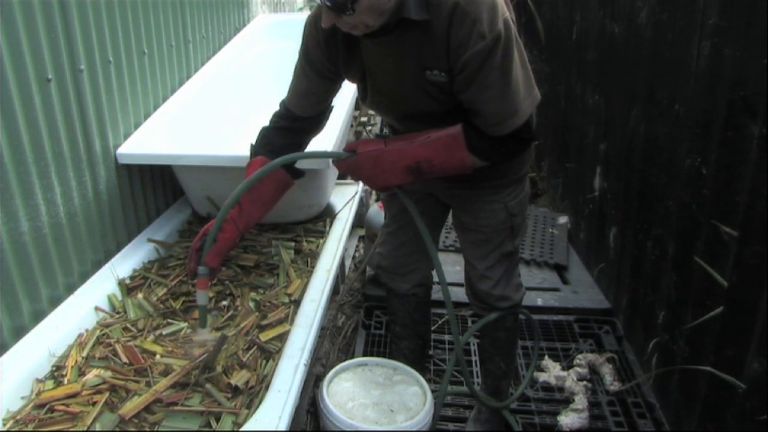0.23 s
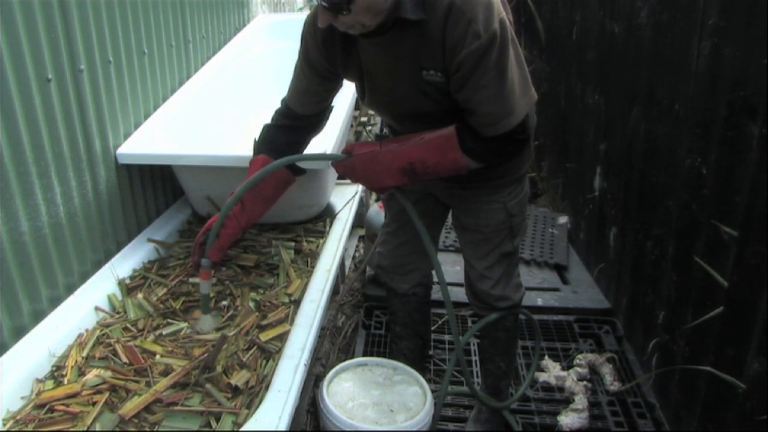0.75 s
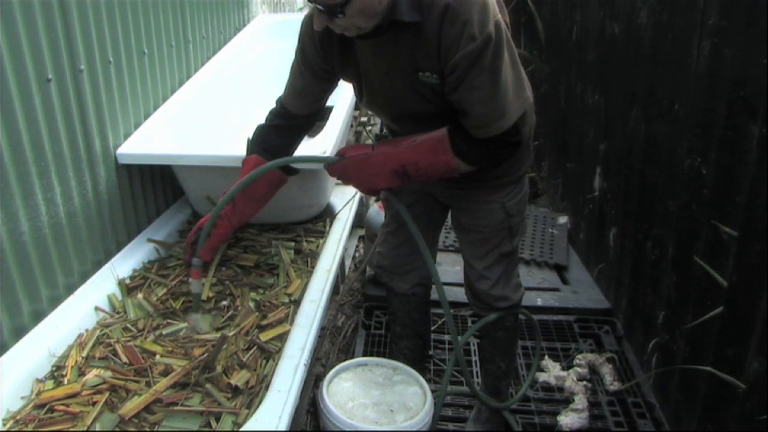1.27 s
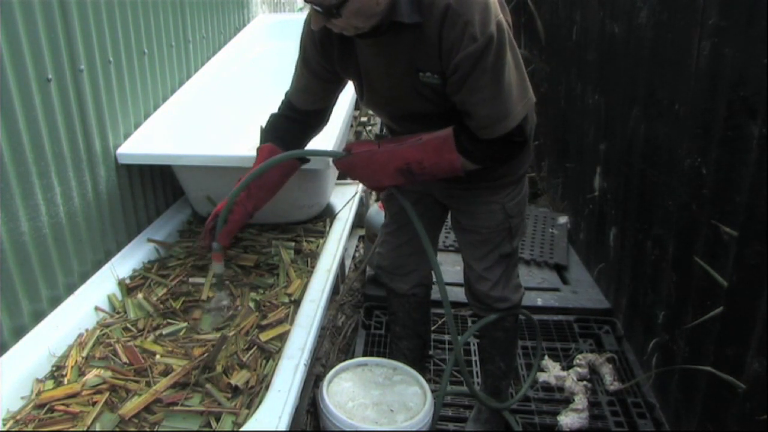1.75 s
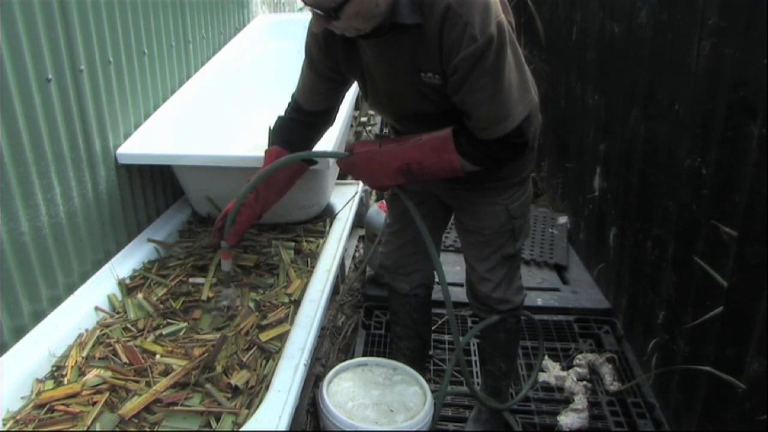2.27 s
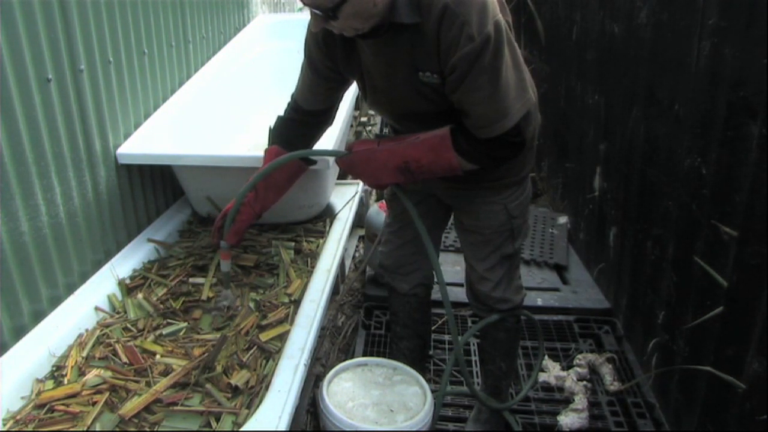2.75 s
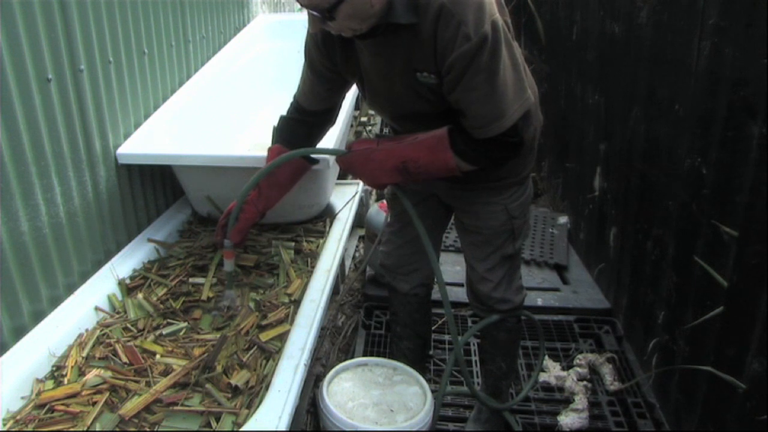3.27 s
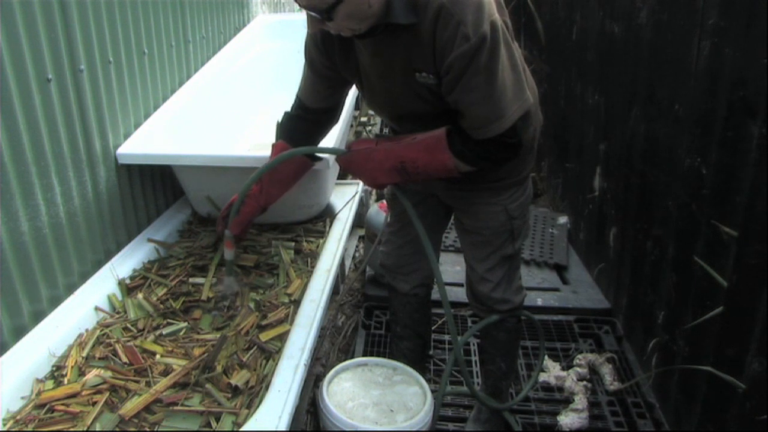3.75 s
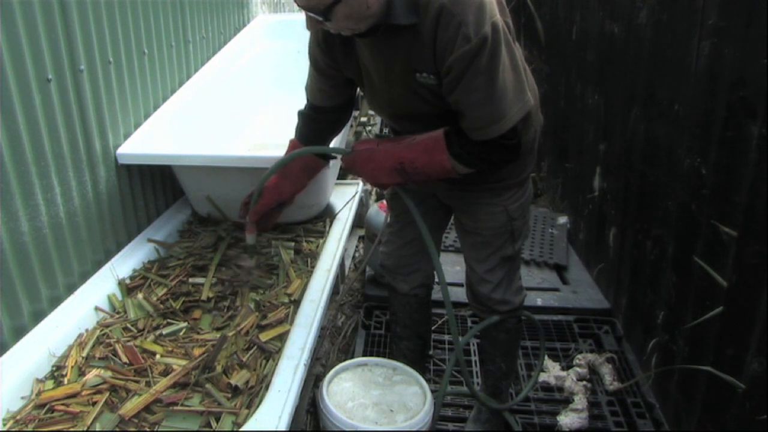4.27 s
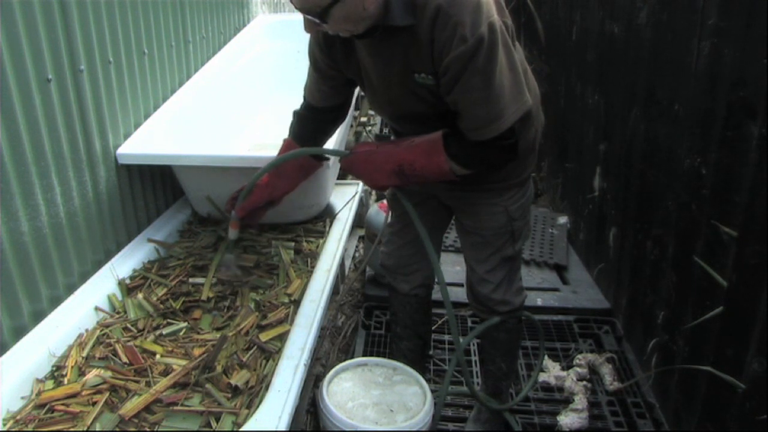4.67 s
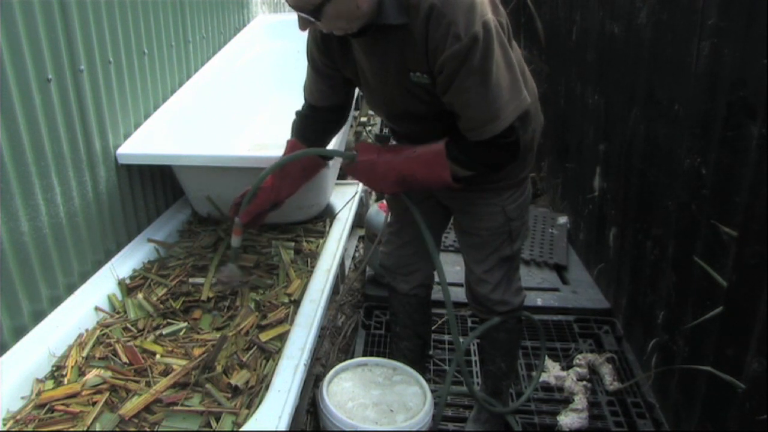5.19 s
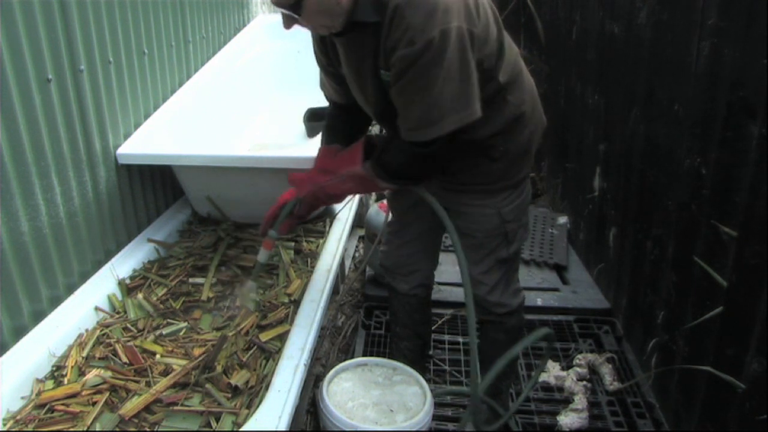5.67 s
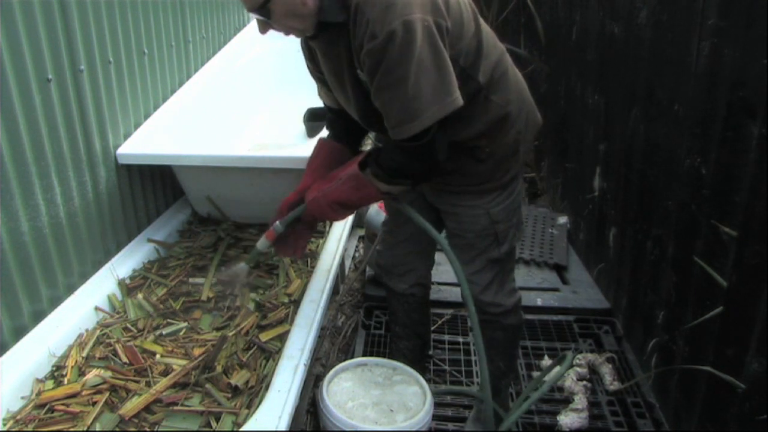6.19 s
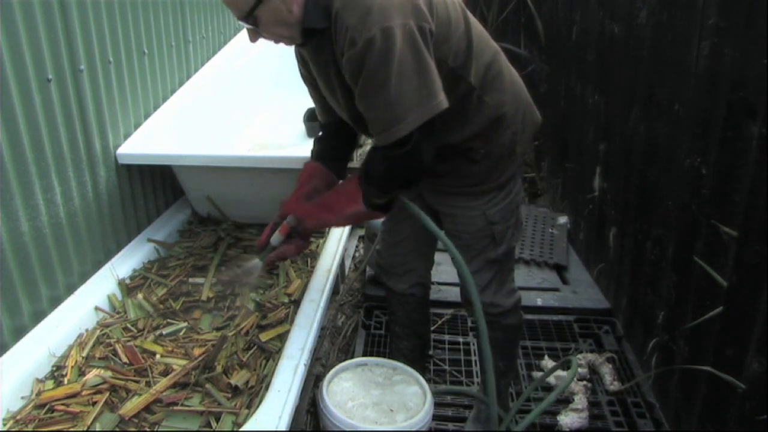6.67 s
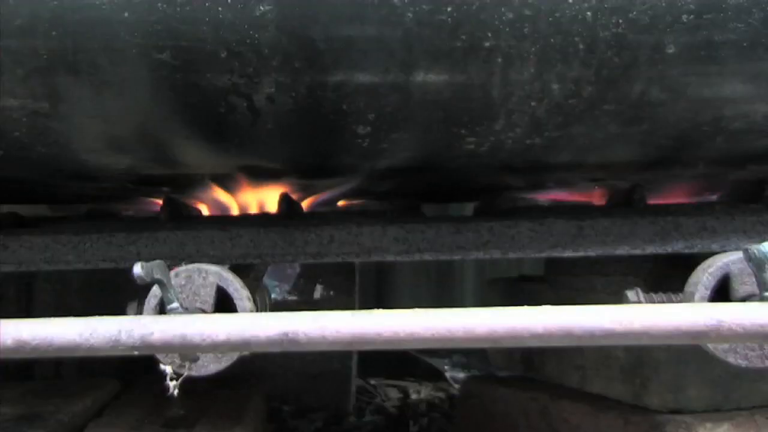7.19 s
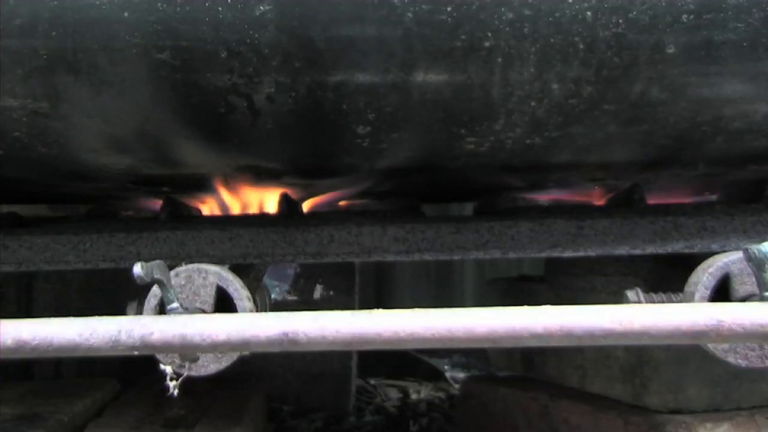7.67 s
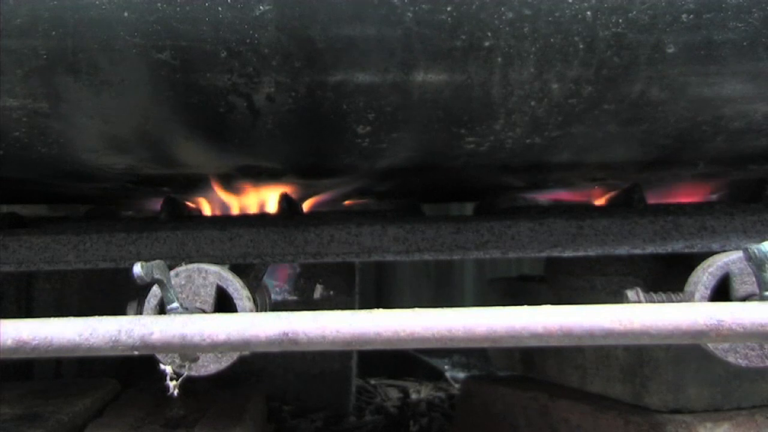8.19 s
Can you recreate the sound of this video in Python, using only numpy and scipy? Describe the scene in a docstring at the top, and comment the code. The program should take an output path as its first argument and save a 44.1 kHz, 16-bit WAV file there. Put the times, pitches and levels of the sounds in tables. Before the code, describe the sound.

Close by in a work area, water from a hose hisses steadily and patters on wet leaves and stalks in a metal tub, with little gurgles and a low motor hum behind. The jet gradually turns into a deeper, hollow drumming that makes the tub resonate. Then the sound switches abruptly to a soft, steady gas burner, with a single short, high squeak just after the change.

```python
"""A hose jet sprays chopped stalks soaking in a metal bath; a motor hums nearby.
Tiny bubbles hiss, mist rushes, drops splatter and patter; brief gurgles and whistles come and go.
The jet drums ever deeper into the water as it is lifted, ringing the bath and its shell.
At 7 s the scene changes at once to a quiet gas burner under a tank, with one small squeak."""
import sys
import numpy as np
from scipy import signal
from scipy.fft import rfft, irfft, next_fast_len
from scipy.io import wavfile
from scipy.ndimage import uniform_filter1d, map_coordinates

SR = 44100
rng = np.random.default_rng(int(sys.argv[2]) if len(sys.argv) > 2 else 0)


def generate_wav(signal):
    """Clip the signal to [-1, 1] and save it as 16-bit WAV at the path in sys.argv[1]."""
    frames = np.transpose(np.atleast_2d(signal))
    scaled = np.clip(frames, -1, 1) * 32767
    pcm = np.round(scaled).astype(np.int16)
    wavfile.write(sys.argv[1], SR, pcm)


N = 372192
T = np.arange(N) / SR
CHANGE_S = 7.03

# nozzle path: t/s, hiss edge/Hz, closeness to the stalks/0-1
NOZZLE_PATH = [(0, 8300, 0.6), (.7, 8950, 1), (1.7, 8800, 0.6), (2.4, 8800, 0.5), (3.1, 8600, 0.6),
               (3.6, 8100, 0.3), (4.1, 8000, 0.3), (4.8, 8400, 0.4), (5.4, 8150, 0.4), (6.5, 8060, 0.2),
               (7, 8900, 0)]
# jet sags and swells as the nozzle moves: t/s, half length/s, hiss/dB, mist/dB
JET_SWERVES = [(0, .2, -0.5, 0.5), (0.46, 0.11, 0.7, 0.5), (1.553, 0.036, -3, 2), (1.915, 0.049, 1, -1),
               (2.201, .12, 1, 0), (3.17, 0.1, -3.5, 3), (3.25, 0.37, 0.5, -2.7), (4.28, .1, 0.5, 1.2),
               (4.683, 0.18, 1.5, -1), (5.197, 0.026, -3, 1), (5.4, 0.24, 0, 2), (5.626, 0.026, 3.5, -1),
               (5.822, 0.03, -4.5, 1), (5.92, 0.046, 2, 0), (6.3, 0.32, 1.9, 1), (6.6, 0.055, 0.5, -1.5),
               (6.73, .06, 0.5, -2.5), (6.86, .06, 1, 2.5)]
# echoes off the bath's sides: delay/ms, gain
WALL_ECHOES = [(1.45, 0.27), (2.049, 0.16), (3.3, 0.16), (4.8, 0.33)]
# gap under a close nozzle: f/Hz, width/Hz, level/dB
GAP_MODES = [(4660, 170, -4), (5270, 150, -4), (5730, 150, -6), (6190, 150, -7), (6750, 200, -10),
             (7280, 200, -8)]
# spray spectra: f/Hz, relative level/dB
HISS_SPECTRUM = [(1500, -37), (3000, -28), (4000, -18), (4900, -8.5), (5700, -2.5), (6400, -1),
                 (7200, -1.1), (8200, -1.5), (9300, -3.5), (11000, -21), (15800, -28)]
MIST_SPECTRUM = [(4000, -22), (7000, -7.5), (8700, 0), (10000, 1.5), (11500, -3), (13300, -11.5),
                 (15800, -22)]
SIZZLE_SPECTRUM = [(6000, -30), (9500, -8), (12000, 0.5), (13500, 0.5), (15800, -2)]
LEAF_SPECTRUM = [(1200, -18), (2200, -6), (3000, -3), (3900, 2), (4700, 1.5), (5400, 1), (6500, -32),
                 (10000, -48)]
STALK_SPECTRUM = [(300, -4), (650, -8.5), (1050, -5.5), (1400, 0.5), (1850, 0.5), (2400, -2.5),
                  (3000, -2.5), (4500, -36), (9000, -35)]
# drops on leaves, drops on stalks, drumming on water: t/s, base level/dB
LEAF_LEVEL = [(0.0, -39), (0.51, -34.5), (3.13, -39.5), (3.28, -42), (3.97, -38), (4.05, -41), (5.08, -37),
              (7.0, -38), (7.02, -39)]
STALK_LEVEL = [(0, -45.5), (.35, -49.5), (.55, -44.5), (1.05, -43.5), (1.25, -46.5), (1.7, -44), (2.4, -44),
               (3.6, -45), (4.0, -44), (4.8, -46), (5.4, -42), (7, -43.5)]
DRUM_LEVEL = [(0.0, -60), (0.5, -58.5), (2.48, -57), (4.0, -50.5), (4.98, -46.5), (5.25, -42.5), (5.6, -39),
              (5.9, -37.5), (6.3, -39), (6.94, -41), (7.02, -42.5)]
# brief gliding resonances: t/s, length/s, first f/Hz, last f/Hz, width/Hz, final level/dB
BRIEF_RESONANCES = [(0, 0.34, 1320, 1317, 250, -51), (0, 0.66, 4530, 4580, 350, -45),
                    (0, 0.73, 661, 683, 295, -50.5), (0.499, 0.27, 2170, 2000, 450, -46),
                    (.45, 1.34, 3070, 2960, 900, -47.5), (0.6, 0.88, 5250, 5330, 280, -41),
                    (0.8, 0.31, 704, 666, 280, -45), (0.929, 0.12, 6900, 6850, 220, -33),
                    (1.12, 0.41, 6680, 6760, 220, -38), (1.244, 0.55, 682, 682, 295, -49),
                    (1.277, 0.19, 2030, 2100, 400, -44), (1.63, 0.11, 631, 668, 260, -40.5),
                    (1.665, 0.098, 1716, 1660, 260, -41.5), (1.754, 0.115, 2055, 2130, 300, -43.5),
                    (1.81, 0.15, 7300, 8100, 600, -34), (1.865, 0.071, 2140, 2150, 270, -38.5),
                    (1.95, 0.26, 2148, 2110, 260, -36.5), (2.119, 0.09, 2120, 2080, 280, -39),
                    (1.85, 0.4, 2750, 2780, 400, -45.5), (1.9, 0.3, 3950, 4020, 300, -43),
                    (2.05, 0.22, 1598, 1500, 704, -43), (2.1, 0.27, 5950, 5780, 420, -37),
                    (2.251, 0.37, 2130, 2130, 240, -44.5), (2.401, 0.75, 4730, 4690, 220, -43.5),
                    (2.548, 0.071, 2110, 1384, 420, -42), (2.65, 0.98, 1962, 1994, 650, -45.5),
                    (3.419, 0.32, 2180, 2266, 280, -48), (2.302, 1.96, 716, 720.5, 250, -54.5),
                    (2.9, 1.0, 2804, 2804, 500, -52), (3.28, 0.33, 7900, 8000, 350, -38),
                    (3.471, 0.22, 6120, 6170, 240, -37), (3.631, .08, 1400, 1400, 150, -49),
                    (4.0, 1.2, 135.1, 135, 110, -49.5), (4.381, 0.19, 733, 772, 280, -42),
                    (4.52, 0.083, 6670, 6620, 260, -39), (4.547, 0.36, 6120, 6450, 280, -34.5),
                    (4.45, 0.92, 201, 215.4, 80, -49.5), (5.17, 0.1, 481, 467, 50, -44),
                    (5.788, 0.088, 309, 311, 30, -41), (5.73, 0.23, 146, 154.6, 60, -42),
                    (5.85, 0.53, 502.5, 496, 60, -43), (6.05, 0.44, 160.5, 150, 50, -43.5),
                    (6.5, 0.43, 149, 149.8, 50, -48), (6.869, 0.13, 549, 660, 150, -42)]
# churned water: f/Hz, relative level/dB
DRUM_SPECTRUM = [(25, -27), (52, -20), (88, -6), (140, 1), (230, 0), (330, -4), (480, -2), (720, -2),
                 (1150, -5.5), (1700, -17), (3000, -16.5), (6000, -49)]
# bath and shell resonances: f/Hz, width/Hz, relative level/dB
BATH_MODES = [(157, 18, 0), (311, 12, 5), (361, 46, -2), (499.5, 33, 2), (609, 34, 0)]
SHELL_MODES = [(132, 14, -5.5), (427.4, 14.4, 3)]
# jet on a singing spot of the shell: t/s, half length/s, level/dB
SHELL_HITS = [(3.7, 0.44, -62), (4.848, 0.12, -53), (5.352, 0.18, -41), (6.2, 0.23, -46)]
# balance of all water sounds: f/Hz, left minus right/dB
WATER_PAN = [(60, -4), (110, -1.5), (200, -1), (380, -0.5), (700, -1), (1290, 0.5), (2380, -1.5),
             (4400, 0.5), (8120, 1), (15000, 2)]
# motor run: t/s, shaft speed/Hz, hum level/dB, base level of weak tones/dB
MOTOR_RUN = [(0, 24.55, -50.5, -67), (1.2, 24.75, -52, -63), (1.7, 24.9, -47, -63), (2.2, 25.2, -49, -60),
             (2.65, 25.4, -54, -60), (3, 25.5, -59, -64), (3.7, 25.9, -61, -60.5), (4.3, 26.1, -58, -56),
             (5.2, 25.9, -53.5, -54), (5.65, 25.7, -51, -58), (5.88, 25.6, -40, -59),
             (6.5, 25.4, -42.5, -62), (6.85, 25.6, -47, -58), (7, 25.7, -53, -59)]
# weak motor tones: shaft multiple, relative level/dB
MOTOR_ORDERS = [(3, -2), (5, 1.5), (8, -10.5), (9, -8)]
# gas rush: f/Hz, relative level/dB
GAS_SPECTRUM = [(18, -42), (30, -16), (120, -5.5), (237, -5), (324, -12), (359, -15.5), (808, -13.5),
                (897, -15), (1080, -12.5), (2020, -14.5), (2620, -14.5), (4910, -14), (6540, -10.5),
                (10700, -16), (15500, -19.5)]
# burner tube: f/Hz, width/Hz, relative level/dB
TUBE_MODES = [(440, 53, -7), (1045, 140, -5), (1390, 53, -1), (2650, 210, -3), (6550, 220, -1.5)]
# squeak parts: t/s, f/Hz, half length/s, level/dB, noise share/0-1
SQUEAK_PARTS = [(7.266, 4500, 0.028, -53, .95), (7.271, 4220, 0.0042, -43, .05),
                (7.296, 3660, 0.0051, -46, .15), (7.313, 3700, .003, -42, .05),
                (7.325, 3400, 0.037, -52.5, 0.9)]
# stereo image: f/Hz, left-right correlation
SPRAY_CORR = [(300, -1.2), (700, 0.4), (1300, 0.53), (2300, 0.22), (3900, 0.69), (4800, 0.49), (5800, 0.76),
              (8000, 0.58), (9300, 0.3), (10500, 0.13), (13300, -0.21), (15500, 0.32)]
WATER_CORR = [(50, 0.82), (150, 0.51), (300, 0.079), (700, 0.13), (1500, 0.06), (3000, 0.21)]
GAS_CORR = [(100, 0.78), (500, 0.58), (2000, 0.28), (7000, 0.36), (14000, .1)]


def amp(db):
    """Decibels to gain."""
    return 10 ** (np.asarray(db) / 20)


def unit(x):
    """Scale to rms 1."""
    return x / np.sqrt(np.mean(x ** 2) + 1e-20)


def along(points, hz):
    """(f/Hz, value) points read on a log axis."""
    f, values = np.transpose(points)
    return np.interp(np.log(hz + 1), np.log(f + 1), values)


def curves(rows):
    """Per-sample curve for each column after t/s."""
    t_s, *columns = np.transpose(rows)
    return [np.interp(T, t_s, column) for column in columns]


def bump(t_s, half_s):
    """Bell curve of height 1."""
    return np.exp(-((T - t_s) / half_s) ** 2)


def wobble(rate_hz, size=N):
    """Smooth random curve, rms near 1."""
    return map_coordinates(rng.standard_normal(int(size * rate_hz / SR) + 4), [T[:size] * rate_hz])


def filtered(x, response):
    """Apply a frequency response."""
    size = next_fast_len(N + SR // 4)
    return irfft(rfft(x, size) * response(np.fft.rfftfreq(size, 1 / SR)), size)[..., :N]


def ringing(modes, hz):
    """Summed response of resonances."""
    return sum(amp(db) * 1j * hz * width / (f * f - hz * hz + 1j * hz * width) for f, width, db in modes)


def stereo(pair, colour, corr):
    """Filter two independent signals and mix as mid and side, rms 1."""
    def response(hz):
        angle = np.arccos(np.clip(along(corr, hz), -1, 1)) / 2
        return colour(hz) * np.array([np.cos(angle), np.sin(angle)])
    mid, side = filtered(pair, response)
    return unit(np.array([mid + side, mid - side]))


def shaped(pair, spectrum, corr=SPRAY_CORR):
    """Stereo signal coloured by a spectrum table."""
    return stereo(pair, lambda hz: amp(along(spectrum, hz)), corr)


def turbulence(depth_db, bins=4, frames=16, fft_size=512):
    """Two noises with random gain patches, bins by frames in size."""
    spectra = signal.stft(rng.standard_normal((2, N)), nperseg=fft_size)[2]
    field = rng.standard_normal(spectra.shape[1:])
    patches = unit(uniform_filter1d(uniform_filter1d(field, bins, 0), frames, 1))
    return unit(signal.istft(spectra * amp(depth_db * patches), nperseg=fft_size)[1][:, :N])


def drops(rate_hz):
    """Impacts of random time and size."""
    return unit((rng.random(N) < rate_hz / SR) * rng.standard_normal((2, N)))


def bubbles(pitch_hz, spread, cycles, rise, count, size):
    """Bubbles ring as damped, rising sines; returns mid and side."""
    t = np.arange(size) / SR
    detune, loudness, pan = rng.standard_normal((count, 4)).T[:3, :, None]
    hz = np.clip(pitch_hz * np.exp(spread * detune), 80, SR / 3)
    age = hz * t / cycles
    envelope = amp(4.2 * loudness) * np.exp(-age) * (1 - np.exp(-hz * t))
    rings = envelope * np.sin(2 * np.pi * hz * t * (1 + rise * np.tanh(age)))
    at = (rng.integers(0, N, (count, 1)) + np.arange(size)).ravel()
    return np.array([unit(np.bincount(at, part.ravel(), N)[:N]) for part in (rings, rings * pan)])


def walls(x):
    """Wall echoes comb the sound; the teeth shift as the nozzle wanders."""
    out = x.copy()
    for delay_ms, gain in WALL_ECHOES:
        delay_s = (delay_ms + 0.11 * wobble(1.1)) / 1000
        out += gain * np.array([np.interp(T - delay_s, T, channel) for channel in x])
    return out


def hand_sway(x, depth=0.009, rate_hz=2.5):
    """An unsteady hand drifts the pitch."""
    clock = np.cumsum(1 + depth * wobble(rate_hz))
    return np.array([map_coordinates(channel, [clock], mode="mirror") for channel in x])


def nozzle_gap(x):
    """The gap between a close nozzle and the stalks resonates."""
    _, closeness = curves(NOZZLE_PATH)
    resonant = unit(filtered(x, lambda hz: 1 + ringing(GAP_MODES, hz)))
    return (1 - closeness) * x + closeness * resonant


def lowpass(x, edge_hz):
    """Steep low-pass with a moving edge, rms 1."""
    hz, t_s, spectra = signal.stft(x, SR, nperseg=256)
    gain = (1 + (hz[:, None] / np.interp(t_s, T, edge_hz)) ** 24) ** -0.5
    return unit(signal.istft(spectra * gain, SR, nperseg=256)[1][:, :N])


def jet_hiss(level_db=-29.5):
    """Tiny bubbles hiss; lingering narrow bands add a whistling sheen."""
    swerve_db = sum(db * bump(t_s, half_s) for t_s, half_s, db, _ in JET_SWERVES)
    edge_hz, _ = curves(NOZZLE_PATH)
    fizz = bubbles(pitch_hz=6377, spread=0.14, cycles=170, rise=0.0008, count=4000, size=1200)
    sheen = turbulence(2.5, bins=3, frames=11, fft_size=1024)
    jet = shaped(walls(sheen + 0.33 * drops(4000) + 0.23 * fizz), HISS_SPECTRUM)
    gain = amp(level_db + swerve_db + 0.56 * wobble(22))
    return gain * lowpass(nozzle_gap(hand_sway(jet)), edge_hz)


def mist(rush_db=-36, sizzle_db=-42):
    """Mist rushes; its finest drops sizzle evenly."""
    def droplets(spectrum):
        return shaped(turbulence(1.6, frames=9) + 0.5 * drops(3500), spectrum)
    swerve_db = sum(db * bump(t_s, half_s) for t_s, half_s, _, db in JET_SWERVES)
    rush = amp(rush_db + swerve_db + 0.8 * wobble(13)) * droplets(MIST_SPECTRUM)
    sizzle = amp(sizzle_db + 0.6 * wobble(8.7)) * droplets(SIZZLE_SPECTRUM)
    return rush + sizzle


def splatter(gain_db=0.5):
    """Larger drops slap wet leaves."""
    leaf_db, = curves(LEAF_LEVEL)
    slaps = turbulence(3.5, bins=3, frames=12, fft_size=1024) + 0.68 * drops(2000)
    return amp(leaf_db + gain_db + 0.62 * wobble(12)) * nozzle_gap(shaped(slaps, LEAF_SPECTRUM))


def patter(drum_share_db=-7):
    """Drops tap the stalks, louder as the drumming grows."""
    stalk_db, = curves(STALK_LEVEL)
    drum_db, = curves(DRUM_LEVEL)
    taps = turbulence(3.5, frames=8) + 0.66 * drops(1400)
    gain = np.hypot(amp(stalk_db), amp(drum_db + drum_share_db))
    return gain * amp(0.53 * wobble(18)) * shaped(taps, STALK_SPECTRUM)


def brief_resonances(attack_s=0.011, release_s=0.032, growth_db=4, hit_rate_hz=8000, side_gain=0.39):
    """Drop-driven gliding bands: hollow gurgles, whistles in the hiss, splatter and low rumbles."""
    size = 2 * SR
    out, age_s = np.zeros((2, N + size)), T[:size]
    for start_s, length_s, first_hz, last_hz, width_hz, db in BRIEF_RESONANCES:
        progress = np.minimum(age_s / length_s, 1)
        gate = (1 - np.exp(-age_s / attack_s)) * np.exp(-np.maximum(age_s - length_s, 0) / release_s)
        hits = (rng.random(size) < hit_rate_hz / SR) * rng.standard_normal((2, size))
        b, a = signal.iirpeak(first_hz, first_hz / width_hz, fs=SR)
        rings = signal.lfilter(b, a, signal.lfilter(b, a, hits))
        glide_clock_s = np.cumsum((last_hz / first_hz) ** progress) / SR
        mid, side = [np.interp(glide_clock_s, age_s, ring) for ring in rings]
        pair = unit(np.array([mid + side_gain * side, mid - side_gain * side]))
        flutter_db = 1.2 * wobble(55, size)
        at = round(start_s * SR)
        out[:, at:at + size] += amp(db + growth_db * (progress - 1) + flutter_db) * gate * pair
    return out[:, :N]


def plunge(water_gain_db=5.5, bath_gain_db=-3, shell_gain_db=-8.5, shell_cap_db=-54.5):
    """The jet churns bubbles into the water, drums the bath and makes its shell sing."""
    drum_db, = curves(DRUM_LEVEL)
    gurgle = bubbles(pitch_hz=562, spread=0.51, cycles=5, rise=0.057, count=2500, size=1500)
    churn = turbulence(2.5, frames=6) + 0.5 * drops(1600) + 0.059 * gurgle
    water = shaped(churn, DRUM_SPECTRUM, WATER_CORR)
    bath = stereo(drops(3000), lambda hz: ringing(BATH_MODES, hz), WATER_CORR)
    shell_response = lambda hz: sum(ringing([mode], hz) ** 2 for mode in SHELL_MODES)
    shell = stereo(drops(2400), shell_response, corr=[(430, 0.16)])
    steady = amp(np.minimum(drum_db + shell_gain_db, shell_cap_db))
    swells = sum(amp(db) * bump(t_s, half_s) for t_s, half_s, db in SHELL_HITS)
    drumming = amp(drum_db + water_gain_db) * water + amp(drum_db + bath_gain_db) * bath
    return drumming + (steady + swells) * shell


def motor(hum_order=6, waver_db=3):
    """A hum and weaker wavering tones, all multiples of the shaft speed."""
    shaft_hz, hum_db, weak_db = curves(MOTOR_RUN)
    phase = 2 * np.pi * np.cumsum(shaft_hz + 0.052 * wobble(8)) / SR
    tone = lambda order: np.sqrt(2) * np.sin(order * phase)
    waver = lambda: amp(waver_db * np.array([wobble(6), wobble(5.5)]))
    weak = sum(amp(db) * waver() * tone(order) for order, db in MOTOR_ORDERS)
    return amp(hum_db + 0.32 * wobble(7)) * tone(hum_order) + amp(weak_db) * weak


def burner(rush_db=-44, tube_db=-51, flame_db=-63, swell_db=13.5, rise_s=0.3):
    """Gas rushes, the tube resonates, the flame flutters; all swell up to their levels."""
    onset = amp(-swell_db * np.exp(-np.maximum(T - CHANGE_S, 0) / rise_s))
    rush = shaped(turbulence(1.1), GAS_SPECTRUM, GAS_CORR)
    tube = stereo(rng.standard_normal((2, N)), lambda hz: ringing(TUBE_MODES, hz), GAS_CORR)
    flame_response = lambda hz: ringing([(150, 33, 0), (238, 92, -2)], hz) ** 2
    flame = stereo(rng.standard_normal((2, N)), flame_response, GAS_CORR)
    return onset * (amp(rush_db) * rush + amp(tube_db) * tube + amp(flame_db + 1.4 * wobble(12)) * flame)


def squeak(width_hz=1100):
    """A short falling rasp with three clear pips."""
    out = np.zeros(N)
    for t_s, hz, half_s, db, noise_share in SQUEAK_PARTS:
        rasp = unit(filtered(rng.standard_normal(N), lambda f: ringing([(hz, width_hz, 0)], f) ** 2))
        tone = np.sqrt(2) * np.sin(2 * np.pi * hz * T)
        blend = np.sqrt(noise_share) * rasp + np.sqrt(1 - noise_share) * tone
        out += amp(db) * bump(t_s, half_s) * blend
    return out


def scene(fade_s=0.037):
    """Bath and motor crossfade to the burner."""
    water = jet_hiss() + mist() + splatter() + patter() + brief_resonances() + plunge()
    panned = filtered(water, lambda hz: amp(np.outer([0.5, -0.5], along(WATER_PAN, hz))))
    fade = np.clip((T - CHANGE_S) / fade_s, 0, 1)
    return (1 - fade) ** 2 * (panned + motor()) + fade * (burner() + squeak())


def record(dry, top_hz=15780):
    """Brick-wall low-pass."""
    return filtered(dry, lambda hz: hz < top_hz)


dry = scene()
out = record(dry)
generate_wav(out)
```